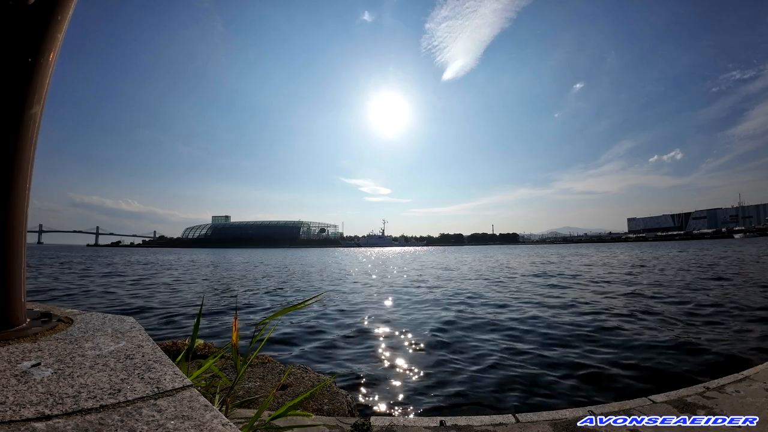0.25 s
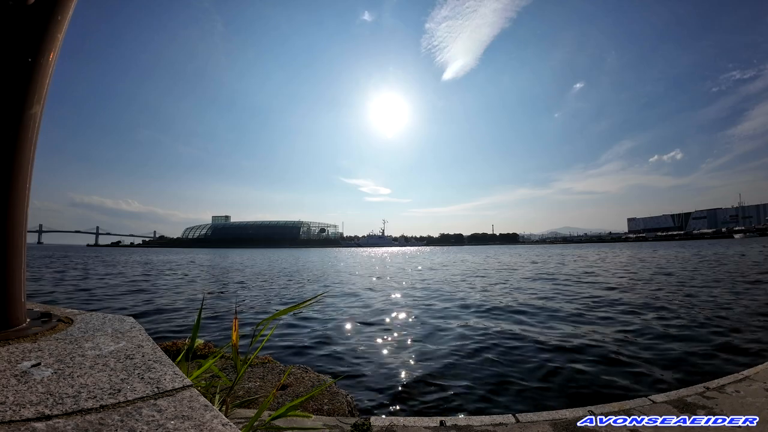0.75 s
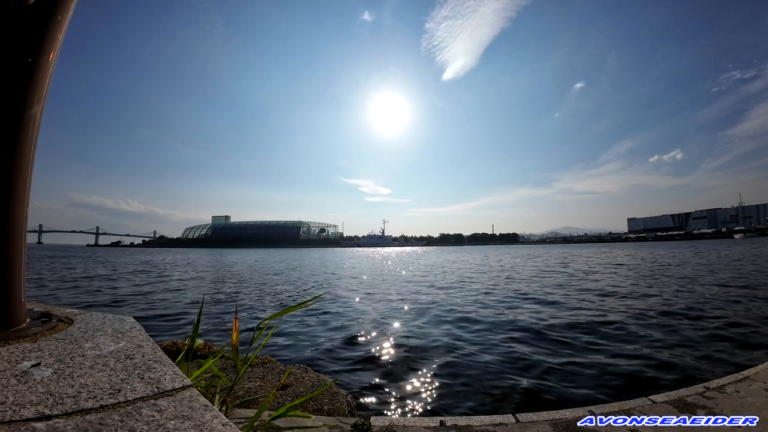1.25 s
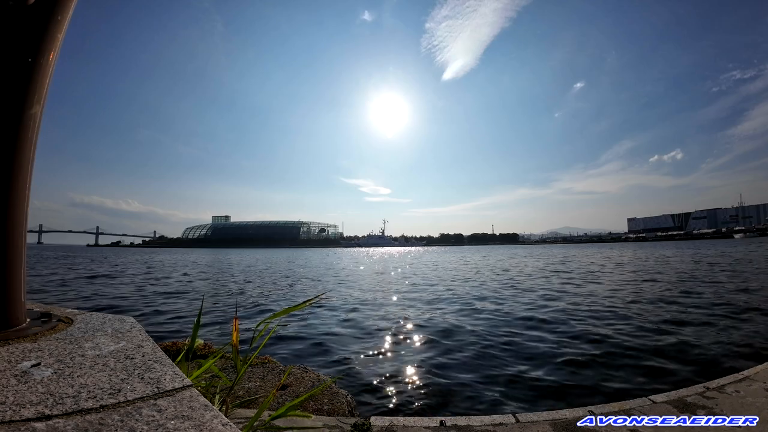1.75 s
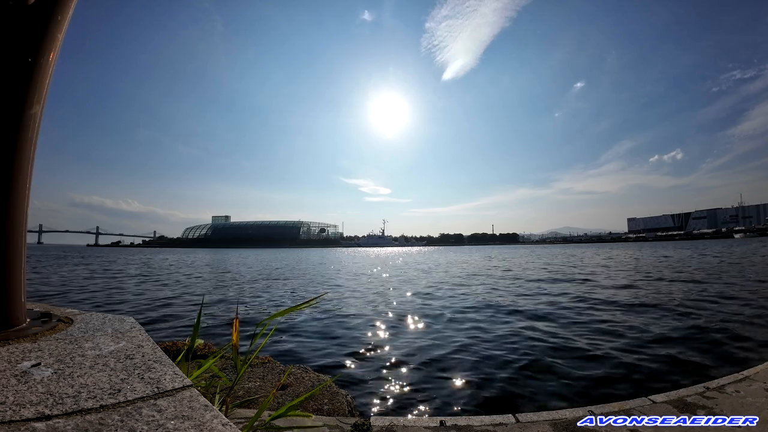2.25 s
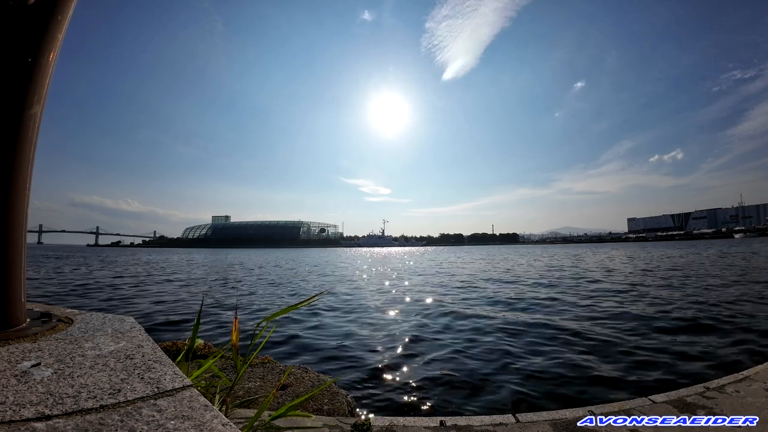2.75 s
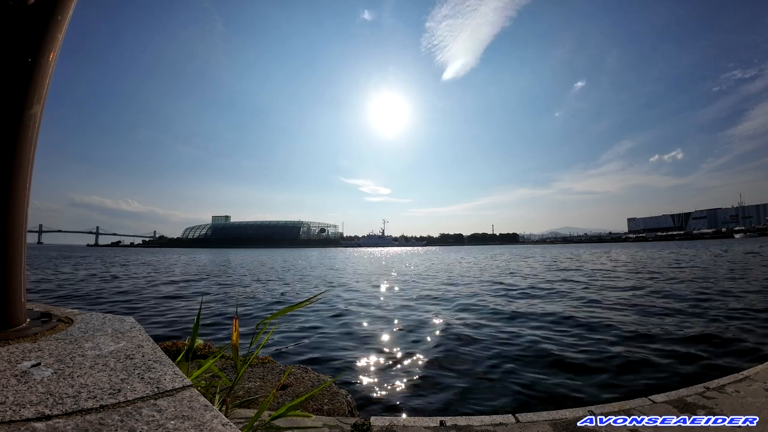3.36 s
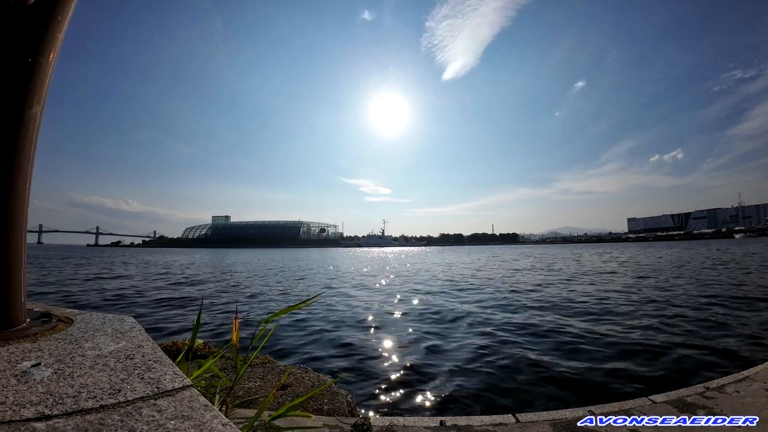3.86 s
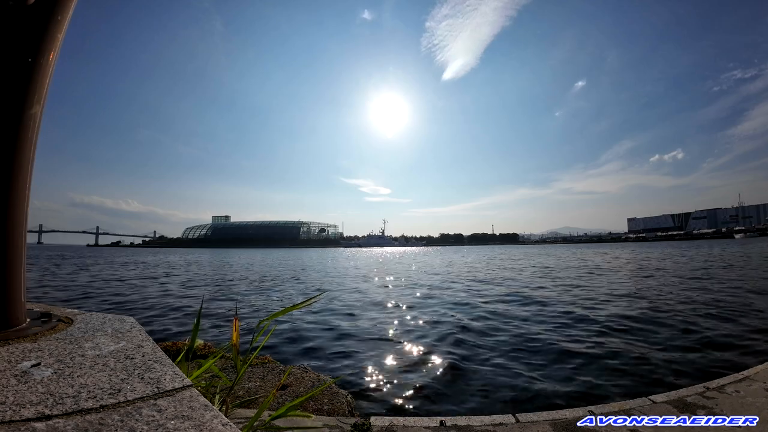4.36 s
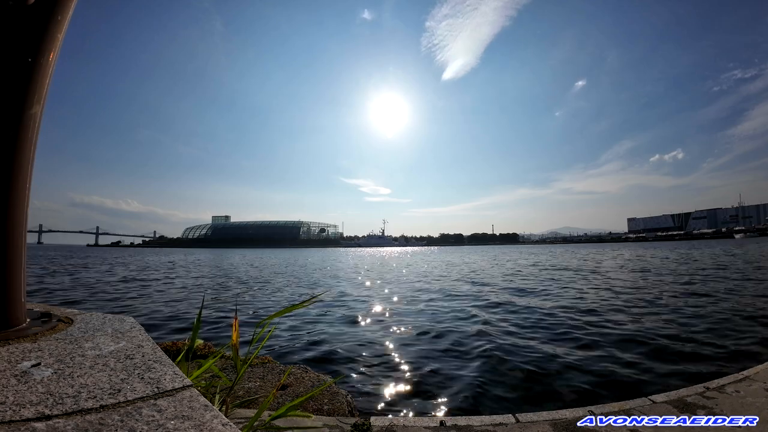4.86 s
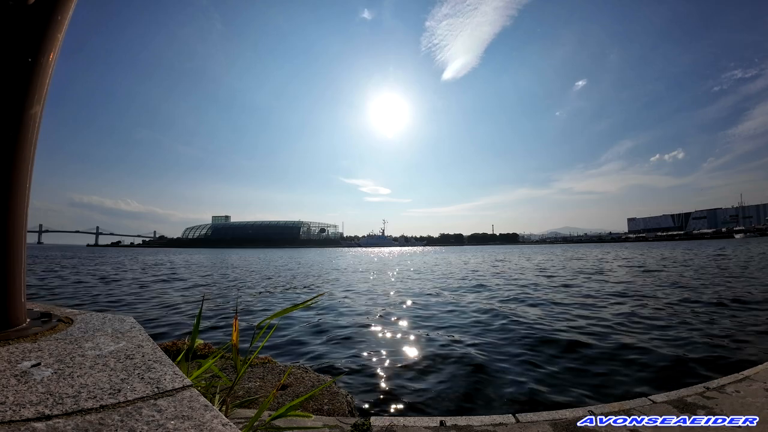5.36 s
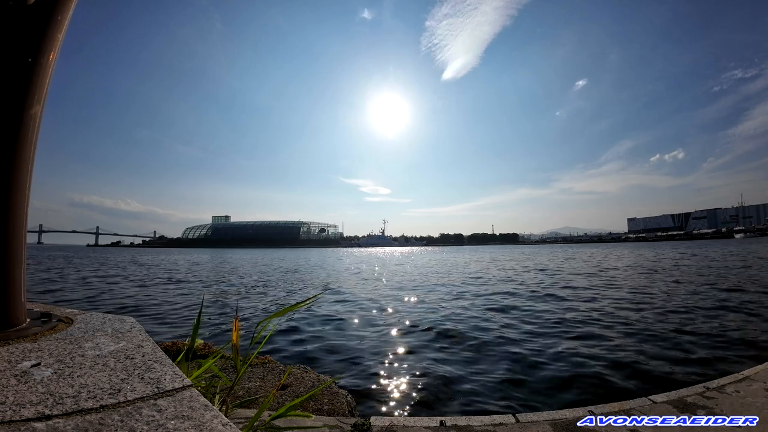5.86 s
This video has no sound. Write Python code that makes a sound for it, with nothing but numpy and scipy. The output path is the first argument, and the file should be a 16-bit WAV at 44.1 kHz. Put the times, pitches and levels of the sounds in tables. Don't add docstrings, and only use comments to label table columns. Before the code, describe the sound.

Steady low machinery hum and distant traffic rumble at a quiet quay, with small bubbling splashes on stone and a faint bird whistle early on.

```python
import sys
import numpy as np
from scipy import signal
from scipy.io import wavfile
from scipy.ndimage import uniform_filter1d

SR = 44100
rng = np.random.default_rng(int(sys.argv[2]) if len(sys.argv) > 2 else 0)


def to_wav(s):
    ch = np.atleast_2d(s).T
    pcm = np.round(np.clip(ch, -1, 1) * 32767)
    wavfile.write(sys.argv[1], SR, pcm.astype(np.int16))


def invert_db(level):
    return 10 ** (np.asarray(level, dtype=float) / 20)


N = 269010

# frequency [Hz], left over right [dB].
PORTS = [(30, -2.3), (60, -1.4), (120, .2), (3000, .2), (5000, 2.5), (6500, -1), (8000, -3), (10500, -2.5),
         (12500, .4)]
# start [s], length [s], fizz level [dB],
# gurgle over fizz [dB], lead of the left port [microseconds].
WAVES = [(0, 0.063, -77, 14, 37), (.12, .3, -84, 14.5, 33), (.7, .13, -75.5, 11, 30),
         (.84, 0.089, -80, 14, 27), (1.0, .2, -83, 12.5, 21), (2.33, 0.17, -87.5, 23, -19),
         (2.72, 0.043, -84.5, 16, -34.5), (3.48, 0.19, -79, 11, 12), (3.79, 0.23, -78.5, 13, -14),
         (4.2, 0.12, -90.5, 25, -26), (4.42, 0.24, -82, 15.5, -33.5), (4.76, 0.057, -76.5, 11.5, -37),
         (5.13, 0.22, -79.5, 12.5, -1), (5.33, 0.12, -81, 9.5, 0)]


def evened(x):
    return x / np.sqrt(np.mean(x ** 2) + 1e-20)


def read(points, hz):
    f, value = np.transpose(points)
    return np.interp(np.log(hz + 1), np.log(f + 1), value)


def curve(table, t):
    s, *columns = np.transpose(table)
    return [np.interp(t, s, c) for c in columns]


def drift(fastest_hz):
    t = np.arange(N) / SR
    rates_hz = fastest_hz * np.geomspace(.1, 1, 12)
    return evened(sum(np.sin(2 * np.pi * (f * t + rng.random())) for f in rates_hz))


def ported(x, left_over_right_db):
    return x * invert_db([[left_over_right_db / 2], [-left_over_right_db / 2]])


def tone(hz, db):
    turns = np.cumsum(hz) / SR + rng.random()
    return np.sqrt(2) * invert_db(db) * np.sin(2 * np.pi * turns)


def noise(size, level_db, patchy_db):
    # frequency [Hz], correlation [0..1].
    likeness = [(25, .72), (60, .85), (130, .98), (330, .991), (700, .97), (1400, .92), (3100, .72),
                (6800, .1), (15000, 0)]
    hop = size // 4
    frames = N // hop + 5
    hz = np.fft.rfftfreq(size, 1 / SR)[:, None]
    a, b, c, d, patches = rng.standard_normal((frames, len(hz), 5)).T
    patches = uniform_filter1d(patches, size // 100, 0)
    patches = evened(uniform_filter1d(patches, 4096 // hop, 1))
    same = np.clip(read(likeness, hz), 0, 1)
    left = a + 1j * b
    right = same * left + np.sqrt(1 - same ** 2) * (c + 1j * d)
    z = np.array([left, right])
    z *= invert_db(level_db(hz, np.arange(frames) * hop / SR) + patchy_db * patches)
    z *= invert_db(read(PORTS, hz) * np.array([.5, -.5])[:, None, None])
    return evened(signal.istft(z, nperseg=size, noverlap=size - hop)[1][:, :N])


def engines():
    # pitch [Hz], rms level [dB], left over right [dB].
    weak_tones = [
        (40.84, -50.5, -6.5),
        (91, -54.5, -3),
    ]
    # time [s], rms level [dB].
    generator_swell = [(0, -37.5), (.35, -34.5), (.9, -36.5), (1.2, -35), (1.8, -36.5), (2.3, -36),
                       (2.85, -37.5), (3.25, -31.5), (3.55, -38.5), (4.0, -34), (4.3, -37), (4.8, -34),
                       (5.3, -37), (5.75, -38.5), (6.0, -32.5), (6.1, -35)]
    # time [s], rms level [dB].
    slow_swell = [
        (0, -44.5),
        (.6, -40),
        (1.5, -66.5),
        (2.2, -37),
        (2.9, -64.5),
        (3.6, -61.5),
        (4.4, -52),
        (5.1, -43.5),
        (6.1, -42),
    ]
    # time [s], pitch [Hz], rms level [dB].
    vehicle = [
        (0, 172, -60.5),
        (.8, 179.2, -49.5),
        (1.7, 177.7, -51.5),
        (2.2, 180, -55.5),
        (2.7, 178.7, -64.5),
        (6.1, 179.6, -71.5),
    ]
    t = np.arange(N) / SR
    out = sum(ported(tone(hz + 0.08 * drift(1.4), db + 0.52 * drift(2.8)), pan_db)
              for hz, db, pan_db in weak_tones)
    out = out + ported(tone(np.full(N, 45.5), *curve(slow_swell, t)), -5.5)
    out = out + ported(tone(58.22 + .03 * drift(1.5), *curve(generator_swell, t)), -1.7)
    hz, db = curve(vehicle, t)
    return out + ported(tone(hz + 1.5 * drift(6.0), db + 2.5 * drift(5.0)), -1.2)


def splash(t):
    calm_fizz_db, calm_gurgle_db, slap_s, drain_s = -86, -77, 0.024, 0.089
    s, length, fizz_db, lower_db = np.transpose(WAVES)[:4, :, None]
    shape = np.exp(-np.maximum(s - t, 0) / slap_s - np.maximum(t - s - length, 0) / drain_s)

    def total_db(calm_db, db):
        return 10 * np.log10(invert_db(2 * calm_db) + (shape ** 2 * invert_db(2 * db)).sum(0))
    return total_db(calm_fizz_db, fizz_db), total_db(calm_gurgle_db, fizz_db + lower_db)


def bubbles(s, db, hz, spread_hz):
    t = np.arange(600) / SR
    ring = .55 / spread_hz[:, None]
    lead = np.interp(s, *np.transpose(WAVES)[[0, 4]]) * 1e-6 + 4e-6 * rng.standard_normal(len(s))
    start = rng.random((len(s), 1))
    first = ((s - 1.2 * ring[:, 0]) * SR).astype(int) - 9
    at = np.clip(first, 0, N - 1)[:, None] + np.arange(600)
    out = np.zeros((2, N + 600))
    for side, mix in zip((.5, -.5), out):
        u = np.maximum(t - 2e-4 + side * lead[:, None], 0) / ring
        shape = (u * np.exp(1 - u)) ** 2
        pop = shape * np.sin(2 * np.pi * (hz[:, None] * ring * u * (.96 + .02 * u) + start))
        pop *= invert_db(db + side * read(PORTS, hz))[:, None]
        np.add.at(mix, at, pop)
    return out[:, :N]


def spray(lo_hz, hi_hz, level_db, count):
    late, pitch, size, wide = rng.random((4 * count, 4)).T
    when, mass = np.repeat(rng.random((count, 2)), 4, axis=0).T
    s = when * N / SR + 6e-4 * late
    hz = lo_hz * (hi_hz / lo_hz) ** pitch
    size_db = -2.6 * np.log(mass + .1) + 5.0 * size - 12.0 * np.log10(hz / lo_hz)
    return bubbles(s, level_db(s) + size_db, hz, hz * (.2 + .5 * wide))


def puffs():
    # start [s], rms level [dB], low edge [Hz], high edge [Hz], length [s].
    puff_list = [
        (.709, -63, 5900, 10300, .006),
        (1.51, -69.5, 4000, 5000, 0.037),
        (1.8, -76, 4780, 5300, 0.029),
        (4.56, -72.5, 3900, 6800, 0.044),
        (1.8, -67, 3100, 3300, .006),
        (0.64, -76, 4600, 5500, .03),
        (2.346, -70, 1400, 5000, 0.021),
    ]
    out = np.zeros((2, N))
    for s, db, lo_hz, hi_hz, length in puff_list:
        u = np.arange(1500) / (length * SR)
        one, other = rng.standard_normal((2, 1500))
        band = signal.butter(3, [lo_hz, hi_hz], "bandpass", fs=SR, output="sos")
        burst = evened(signal.sosfilt(band, [one, .8 * one + 0.35 * other]))
        out[:, int(s * SR):][:, :1500] += invert_db(db) * burst * np.minimum(8 * u, 1) * np.exp(-2 * u ** 3)
    return out


def wall(x):
    t = np.arange(2600) / SR
    tail = rng.standard_normal((2, len(t))) * invert_db(-60 * t / 0.036) * (t > .0015)
    tail /= np.linalg.norm(tail[0])
    return x + invert_db(-8.5) * signal.fftconvolve(x, tail, axes=1)[:, :N]


def water():
    # time [s], level [dB], pitch [Hz].
    glugs = [(.0087, -55, 1890), (0.023, -48.5, 1380), (.049, -49, 2150), (0.0527, -52, 2880),
             (.2231, -54, 2670), (0.754, -52, 1720), (.789, -52, 2980), (1.3916, -55, 2040),
             (2.3483, -57.5, 3010), (2.4173, -49, 1460), (2.425, -46, 2100), (2.468, -54, 1810),
             (2.5504, -52.5, 2330), (2.7478, -53, 3270), (3.1211, -54, 2070), (3.1309, -58, 3300),
             (3.4781, -50, 2240), (3.5614, -52, 3460), (3.591, -58, 3270), (3.606, -45.5, 3060),
             (3.6876, -53, 2670), (3.828, -55, 2670), (4.0194, -57, 3270), (4.223, -51, 2030),
             (4.4533, -55, 2690), (4.7875, -58, 2860), (5.2225, -52.5, 1720), (5.2332, -59, 3480),
             (5.3491, -53, 2410), (5.476, -53.5, 3040)]
    # time [s], level [dB], pitch [Hz].
    pops = [(.0533, -53.5, 4960), (.7102, -60, 5000), (.7668, -61, 5800), (.7864, -56, 3860),
            (.8456, -55, 6460), (1.527, -57, 4310), (2.3646, -62, 4740), (2.7407, -52.5, 5000),
            (2.7472, -54.5, 5360), (3.67, -50.5, 6660), (3.67, -51, 3980), (3.676, -56, 7580),
            (3.6777, -50, 4350), (3.6822, -53, 5300), (3.7992, -58, 6370), (3.8351, -56, 4850),
            (3.8803, -62, 4910), (3.8982, -60, 5680), (3.9153, -49.5, 5300), (3.9352, -53, 4910),
            (3.969, -59, 4740), (4.0207, -61, 6980), (4.437, -57, 6030), (4.7799, -60, 4390),
            (4.8223, -60, 5800), (5.1352, -57, 3900), (5.1453, -57.5, 6070), (5.2854, -63, 5600),
            (5.356, -56, 4480), (5.238, -59, 3900)]
    # time [s], level [dB], pitch [Hz].
    ticks = [(.018, -64, 7060), (.7102, -53, 10770), (.7112, -54, 8960), (.7195, -70, 10420),
             (.7265, -70, 8700), (.7679, -60, 10680), (.8452, -59, 9990), (.8838, -53, 10040),
             (.8936, -48, 9900), (.9018, -66, 9990), (2.7962, -67, 8870), (3.5037, -64, 8400),
             (3.5499, -70, 10160), (3.5692, -62, 10200), (3.653, -67, 8960), (3.686, -53, 8660),
             (3.8155, -62, 9500), (3.8405, -66, 8960), (3.8596, -55, 8250), (3.908, -61, 7320),
             (3.9385, -62, 9800), (3.9929, -62, 10080), (4.0093, -66, 10340), (4.8087, -63, 8180),
             (5.1831, -61, 8800), (5.2512, -62, 8180), (5.2659, -64, 9990), (5.2969, -53, 9900),
             (5.3148, -70, 10680), (5.342, -62, 10680)]
    # time [s], level [dB], centre [Hz].
    smacks = [(3.6707, -43.5, 2500), (3.8152, -42.5, 2390), (3.8596, -53, 5940), (3.879, -51, 1810),
              (3.9488, -49.5, 6500), (5.2702, -48, 1550), (5.3899, -45, 3600), (5.1835, -58, 8500),
              (2.659, -57, 5000), (2.6, -53, 4800), (3.037, -59, 6300), (3.252, -64, 4500),
              (3.293, -59, 3800), (4.521, -59, 6000), (4.808, -56, 7300), (3.3, -51, 4500),
              (3.6065, -58, 4500), (2.7475, -56, 4500), (5.261, -55, 4200), (1.654, -50, 2800),
              (5.2765, -54, 4500), (5.3029, -50, 8200), (5.3371, -49, 8000), (5.3375, -46, 3100),
              (5.3556, -53, 6300), (5.4022, -53, 6120), (5.652, -52, 5700)]
    # time [s], level [dB], centre [Hz].
    near = [
        (.7097, -60, 14500),
        (.712, -64, 13500),
        (.8925, -64, 13500),
        (.895, -67, 14500),
        (1.7116, -57, 12800),
    ]
    s, db, hz = np.transpose([*glugs, *pops, *ticks, *smacks])
    share = np.repeat([0, .21, .16, .8], [len(glugs), len(pops), len(ticks), len(smacks)])
    spread_hz = np.where(share > 0, share * hz, 500)
    clear = invert_db(0.5) * bubbles(s, db, hz, spread_hz)
    clear += bubbles(s, db + 20 * np.log10(hz / spread_hz) - 17, hz, 1.1 * hz)
    fizz = spray(4000, 11500, lambda s: splash(s)[0] + 3, count=1500)
    gurgle = spray(1200, 5000, lambda s: splash(s)[1] + 0.5, count=1200)
    strays = spray(2500, 11000, lambda s: 1.6 * (splash(s)[0] + 78) - 68, count=200)
    housing = signal.butter(8, 11700, fs=SR, output="sos")
    dulled = signal.sosfilt(housing, clear + fizz + gurgle + strays)
    s, db, hz = np.transpose(near)
    return wall(dulled + bubbles(s, db, hz, .3 * hz) + puffs())


def kite():
    # time [s], pitch [Hz], rms level [dB].
    whistle = [
        (.342, 2740, -100),
        (.35, 2780, -69),
        (.38, 3200, -72),
        (.42, 3070, -74.5),
        (.55, 2965, -74.5),
        (.69, 2945, -72),
        (.75, 2930, -78),
        (.965, 2970, -75),
        (.982, 2500, -69),
    ]
    # time of the top [s], top pitch [Hz], rms level [dB].
    trill = [(1.052, 2960, -70.5), (1.155, 2790, -70), (1.237, 2950, -74), (1.327, 2760, -73),
             (1.432, 2830, -70), (1.54, 2800, -70), (1.637, 2900, -70), (1.745, 2800, -69),
             (1.845, 2880, -70), (1.955, 2880, -71), (2.08, 2930, -68.5), (2.185, 2960, -69),
             (2.312, 2980, -71)]
    trough_hz, rise_s, fall_s = 2380, .052, .045
    t = np.arange(N) / SR
    hz, db = curve(whistle, t)
    for s, top_hz, note_db in trill:
        u = np.where(t < s, (t - s) / rise_s, (t - s) / fall_s)
        on = u > -1.3
        arch_hz = trough_hz + (top_hz - trough_hz) * (1 - np.clip(abs(u), 0, 1) ** 1.2)
        arch_db = np.interp(u, [-1, -.6, -.3, 0, .3, .65, 1], [-10, -4.5, -2, -8, -12, -7, -9])
        hz = np.where(on, arch_hz, hz)
        db = np.where(on, note_db + arch_db, db)
    db = uniform_filter1d(np.where(t > trill[-1][0] + fall_s, -120, db), 200)
    song = tone(uniform_filter1d(hz, 300), db)
    flutter = invert_db(1.3 * drift(70.0))
    echo = 0.18 * np.roll(song, 900)
    return ported(song * flutter + echo, .5)


def wash():
    # frequency [Hz], density [dB per Hz].
    hiss = [(700, -27.5), (1200, -5), (2100, -7), (2700, -10), (3500, -12.5), (4200, -26), (5200, -16),
            (6700, -24), (8900, -31), (10200, -26.5), (11300, -29.5), (12300, -43), (14000, -44.5),
            (15300, -29.5)]

    def field_db(hz, t):
        fizz_db, gurgle_db = splash(t)
        rise_db = np.where(hz < 4500, gurgle_db + 73, fizz_db + 88)
        return read(hiss, hz) + .3 * rise_db * (hz < 11700)
    return invert_db(-70) * noise(512, field_db, patchy_db=.45)


def town():
    # frequency [Hz], density [dB per Hz].
    roar = [(12, -3.5), (30, 2), (50, 1.5), (70, -1), (110, -5), (200, -13), (330, -15.5), (450, -21.5),
            (1000, -29.5), (2000, -42.5), (4000, -54.5), (8000, -74.5)]
    # time [s], traffic level [dB].
    traffic = [(0, -44.5), (.6, -43.5), (1.2, -45.5), (1.8, -44.5), (2.3, -45.5), (2.9, -47), (3.5, -48.5),
               (4.2, -47), (4.9, -46.5), (5.5, -46.5), (6.1, -49.5)]

    def field_db(hz, t):
        swell_db = curve(traffic, t)[0] + 46
        share = np.exp(-(np.log((hz + 1) / 160) / 0.87) ** 2)
        high = (hz > 250) * (1 - share)
        return read(roar, hz) + share * swell_db + high * (0.16 * swell_db - 1.26)
    return invert_db(-38.5) * noise(4096, field_db, patchy_db=.5)


def scene():
    return engines() + water() + kite() + wash() + town()


def low_pass(x):
    return signal.sosfilt(signal.butter(12, 15710, fs=SR, output="sos"), x)


def record(dry):
    return low_pass(dry)


dry = scene()
out = record(dry)
to_wav(out)
```